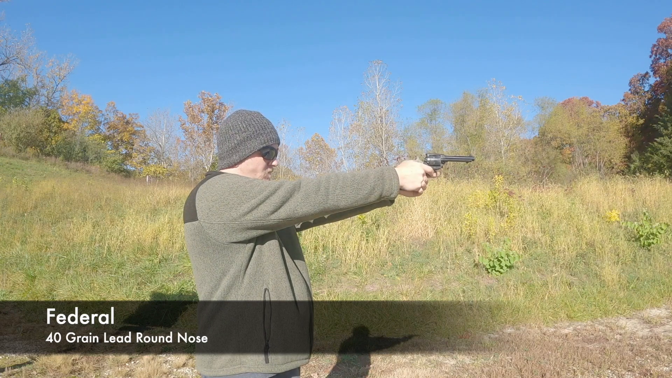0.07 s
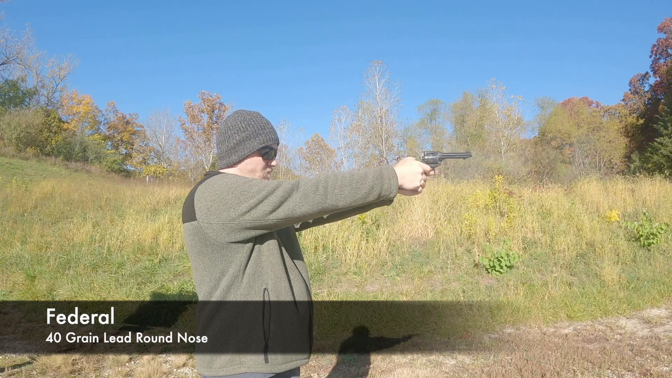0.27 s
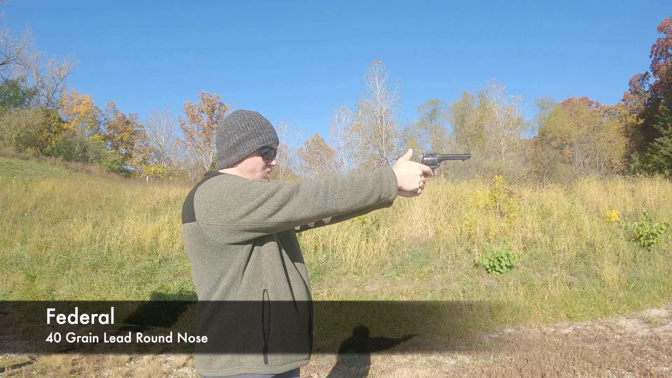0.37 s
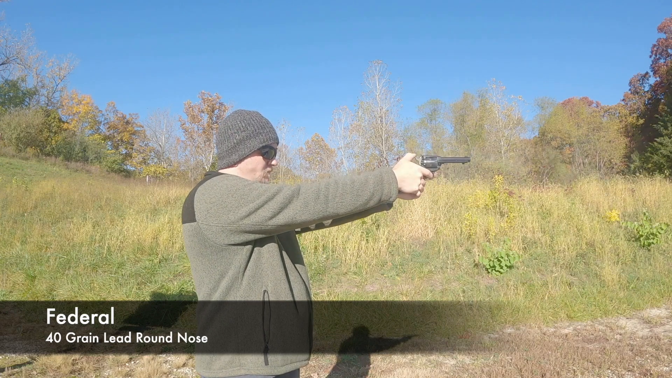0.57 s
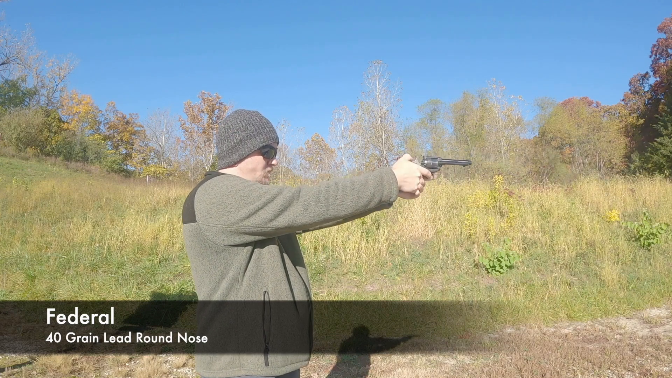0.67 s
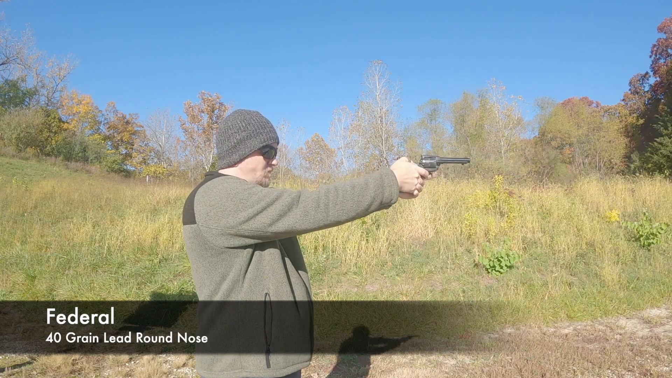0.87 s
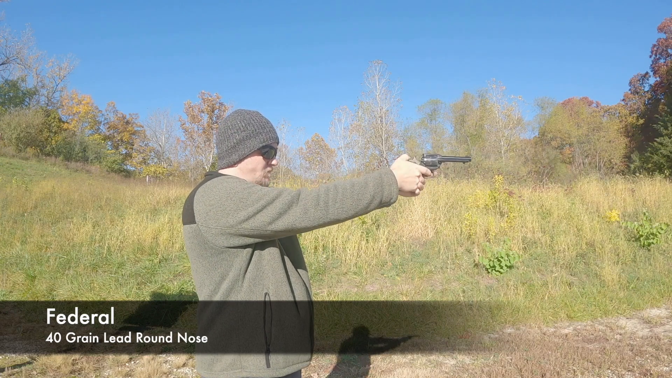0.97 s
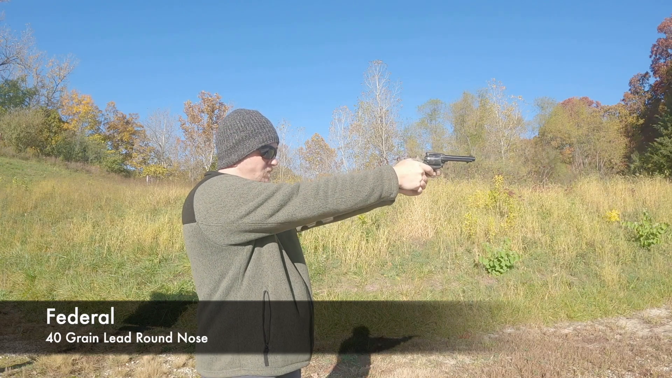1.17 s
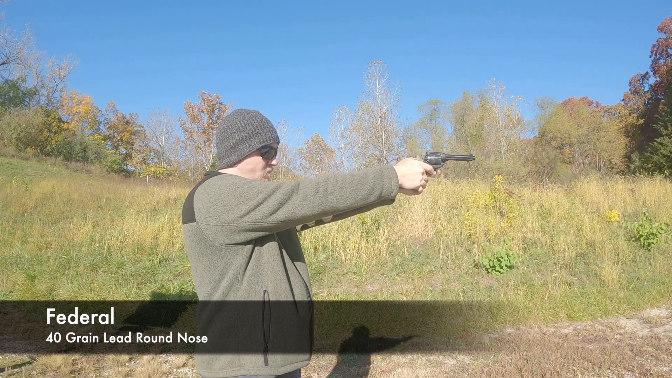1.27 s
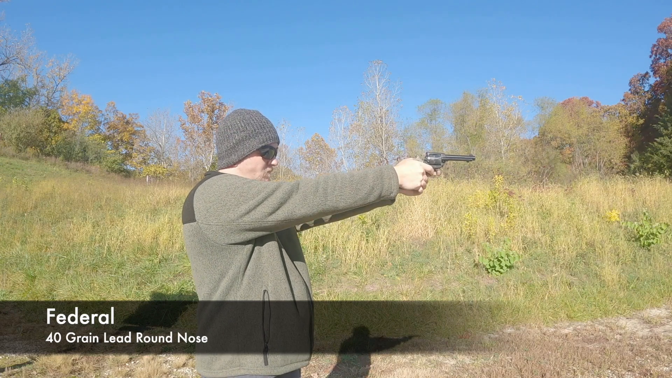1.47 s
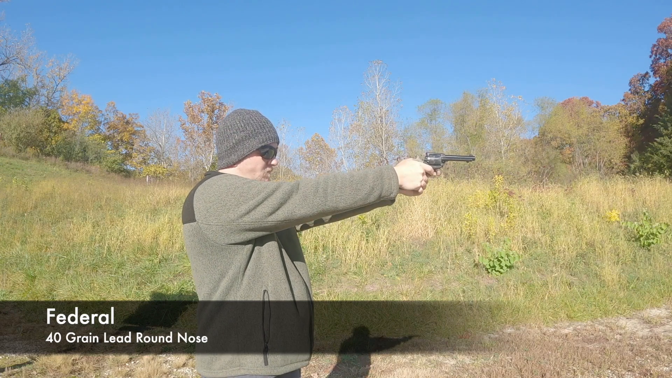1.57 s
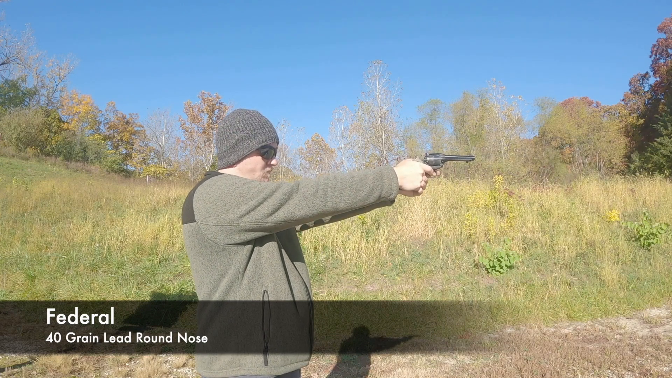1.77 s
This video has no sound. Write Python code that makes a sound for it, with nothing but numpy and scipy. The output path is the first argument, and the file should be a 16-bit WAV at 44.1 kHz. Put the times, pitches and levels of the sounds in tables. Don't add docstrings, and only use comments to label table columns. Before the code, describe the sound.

A small revolver fires once outdoors, close to an overloading camera microphone. Faint insects trill over a soft hush; a hammer knock and smeared, growing pre-echoes lead into the sharp crack at 0.23 seconds. A bank slaps back near 0.36, trees swell around 0.5, then dull and fade toward 1.8. Small metallic cocking clicks run from 0.37 to 1.0, loudest at 0.82. A faint insect returns near 1.5.

```python
import sys
import numpy as np
from scipy import signal
from scipy.fft import rfft, irfft, next_fast_len
from scipy.io import wavfile
from scipy.ndimage import uniform_filter1d, map_coordinates

SR = 44100
rng = np.random.default_rng(int(sys.argv[2]) if len(sys.argv) > 2 else 0)


def voltage_ratio(decibels):
    exponent = np.asarray(decibels, float) / 20
    return 10 ** exponent


def to_wav(sig):
    pcm = np.clip(np.atleast_2d(sig), -1, 1) * 32767
    pcm = np.round(pcm).astype(np.int16)
    wavfile.write(sys.argv[1], SR, pcm.T)


N = 79380
SHOT_S = 0.228


def unit(x):
    return x / np.sqrt(np.mean(x ** 2) + 1e-20)


def along(points, hz):
    f, v = np.transpose(points)
    return np.interp(np.log(hz + 1), np.log(f + 1), v)


def wobble(rate):
    knots = rng.standard_normal(int(N * rate / SR) + 4)
    return map_coordinates(knots, [np.arange(N) * rate / SR])


def filtered(x, response):
    m = next_fast_len(N + SR // 2)
    return irfft(rfft(x, m) * response(np.fft.rfftfreq(m, 1 / SR)), m)[..., :N]


def ring(s, hz, db, t60):
    out = np.zeros(N)
    start = int(s * SR) + 1
    t = np.arange(start, min(N, start + SR // 10)) / SR - s
    rise = 1 - np.exp(-t / 0.00008)
    out[start:start + len(t)] = voltage_ratio(db - 60 * t / t60) * np.sin(2 * np.pi * hz * t) * rise
    return out


def puff(s, hz, db, cycles):
    t = np.arange(N) / SR - s
    return voltage_ratio(db) * np.exp(-(t * hz / cycles) ** 2) * np.cos(2 * np.pi * hz * t)


def dying(s, db, t60):
    t = np.arange(N) / SR - s
    return (t > 0) * voltage_ratio(db - 60 * np.maximum(t, 0) / t60)


def noise(spectrum, grain_db):
    raw = rng.standard_normal(N) * voltage_ratio(grain_db * rng.standard_normal(N))
    return unit(filtered(raw, lambda hz: voltage_ratio(along(spectrum, hz))))


def far_hush():
    # frequency in Hz, level in dB per Hz.
    hush_color = [(90, -45.5), (150, -5), (600, 3), (1300, -2.5), (5500, -24.5), (7300, -18), (8600, -42.5),
                  (15500, -60)]
    ducked = np.arange(N) / SR > SHOT_S
    level_db = -59.5 - 5.5 * ducked + 1.2 * wobble(12)
    return voltage_ratio(level_db) * noise(hush_color, grain_db=2.0)


def trilling_insect():
    center_hz, drop_hz, ticks_hz, teeth_hz = 7480, 300, 27.3, 300
    t = np.arange(N) / SR
    stroke = np.pi * ticks_hz * (t - 0.027)
    teeth = 1 + 0.9 * np.cos(2 * np.pi * teeth_hz * t + 0.8 * wobble(40))
    phase = 2 * np.pi * center_hz * t + drop_hz / ticks_hz * np.cos(2 * stroke) + 0.9 * wobble(300)
    ticks = np.abs(np.cos(stroke)) ** 7
    return voltage_ratio(-75 + 2.5 * wobble(42)) * ticks * teeth * np.sin(phase)


def scooping_insect():
    # start in seconds, length in seconds, level in dB, held pitch in Hz.
    songs = [
        (-.08, .3, -68.5, 6973),
        (1.485, .5, -73.5, 7170),
    ]
    scoop_hz, scoop_s, rise_s = 600, 0.034, 0.11
    out = np.zeros(N)
    for s, length, db, hz in songs:
        since = np.maximum(np.arange(N) / SR - s, 0)
        pitch = hz - scoop_hz * np.exp(-since / scoop_s) + 45 * wobble(120)
        hold = np.clip(since / rise_s, 0, 1) * (since < length)
        scratch = voltage_ratio(db + 3.4 * wobble(150) + 2.5 * wobble(500))
        out += scratch * hold * np.sin(2 * np.pi * np.cumsum(pitch) / SR)
    return out


def hammer_fall():
    # time in seconds, level in dB, pitch in Hz, length in cycles.
    knocks = [
        (.1873, -23, 1800, .8),
        (.1872, -35.5, 5500, 2),
        (0.22, -32.5, 1500, 1.1),
    ]
    return sum(puff(s, hz, db, cycles) for s, db, hz, cycles in knocks)


def lockwork():
    # time in seconds, level in dB, pitch in Hz, sizzle in dB against the click.
    clicks = [
        (0.3705, -30, 5000, -14),
        (0.6118, -29.5, 3240, -34),
        (0.6837, -31, 4600, -15.5),
        (0.7362, -47, 5940, -5),
        (0.821, -20.5, 3100, -22),
        (1.0139, -37, 5170, -13.5),
    ]
    ring_t60, sizzle_t60 = 0.0065, 0.008
    sizzle = filtered(rng.standard_normal(N), lambda f: f ** 2 / 1e8 / (1 + (f / 10500) ** 8))
    sizzle = unit(sizzle)
    tap = noise([(400, -23.5), (1500, 11), (5000, -3), (9000, -16)], grain_db=7.5)
    out = np.zeros(N)
    for s, db, hz, bright_db in clicks:
        out += ring(s, hz, db, ring_t60)
        out += ring(s + 0.0002, 1.164 * hz, db - 2, ring_t60)
        out += dying(s, db + bright_db, sizzle_t60) * sizzle
        out += dying(s - 0.0008, db - 10, sizzle_t60) * tap
    return out


def crack():
    # delay in seconds, level in dB, signed strength.
    arrivals = [
        (0, 3.5, 0.47),
        (.00035, 2.5, -0.74),
        (.0016, -3, -1.3),
    ]
    # frequency in Hz, level in dB, 60 dB decay in seconds.
    modes = [(1536, -7, 0.0081), (2023, -4, 0.0051), (3280, 1.5, 0.0029), (5000, -5, .003),
             (890, -16, 0.0088)]
    out = np.zeros(N)
    for delay, db, sign in arrivals:
        for hz, level, t60 in modes:
            out += sign * ring(SHOT_S + delay, hz, db + level, t60)
    return out


def gas_spray():
    # frequency in Hz, level in dB per Hz.
    gas_color = [(88, -24), (150, 2), (1050, -29), (2020, -11.5), (3820, -17.5), (5100, -22), (15000, -75)]
    return dying(SHOT_S, -9, 0.027) * noise(gas_color, grain_db=7)


def fore_runners(blast):
    copies_db = [-2, -8, -22.5, -38]
    spacing_s, top_hz = 0.010665, 5830

    def early(f):
        total = 0
        for k, db in enumerate(copies_db):
            advance = np.exp(2j * np.pi * f * spacing_s * (k + 1))
            total = total + (-1) ** (k + 1) * voltage_ratio(db) * advance
        return total / (1 + (f / top_hz) ** 10)

    return filtered(blast, early)


def processing_grit():
    start_s = 0.199
    t = np.arange(N) / SR
    grit = unit(filtered(rng.standard_normal(N), lambda f: (f < 9600) * (f > 2100)))
    gate = (t > start_s) * (t < SHOT_S + 0.004)
    return voltage_ratio(-46.5 + 300 * (t - start_s)) * grit * gate


def shot():
    # frequency in Hz, level in dB, 60 dB decay in seconds.
    push = [(95, -19, .03), (155, -15, 0.049), (353, -8, .04), (588, -25, 0.034)]
    # frequency in Hz, level in dB per Hz.
    near_color = [(100, -31), (290, -5.5), (450, -2.5), (800, -13), (2500, -10.5), (7500, -21.5),
                  (9000, -33.5), (15000, -55.5)]
    core = crack() + sum(ring(SHOT_S, *mode) for mode in push)
    blast = core + gas_spray() - puff(SHOT_S + 0.00653, 600, -14.5, 0.63)
    smeared = core + voltage_ratio(1.5) * gas_spray() + puff(SHOT_S + 0.00767, 600, -11.5, 0.53)
    near = dying(SHOT_S, -34.5, 0.34) * noise(near_color, grain_db=4.5)
    return voltage_ratio(2.5) * (blast + fore_runners(smeared)) + processing_grit() + near


def ground_thuds():
    hz, width_hz = 261, 200
    raw = rng.standard_normal(N) * voltage_ratio(4.1 * wobble(45))
    thuds = filtered(raw, lambda f: (1j * f * width_hz / (hz ** 2 - f * f + 1j * f * width_hz)) ** 2)
    return dying(SHOT_S, -44.5, 1.2) * unit(thuds)


def berm_and_trees():
    # time in seconds, level in dB.
    slaps = [
        (0.3584, -24.5),
        (.3604, -30),
        (0.3622, -27),
    ]
    # time in seconds, level in dB.
    swell = [(0.331, -52), (.352, -50), (.365, -40), (0.402, -41), (0.437, -32.5), (0.464, -30),
             (.49, -26.5), (.53, -31), (.56, -31), (.61, -35.5), (.67, -37.5), (0.748, -40), (.85, -43),
             (0.949, -46.5), (1.1, -48), (1.3, -50), (1.5, -54.5), (1.8, -58.5)]
    # frequency in Hz, level in dB per Hz.
    wood_color = [(130, -55), (330, -9), (640, -0.5), (1500, -5), (3300, -3.5), (7600, -21.5),
                  (9200, -36.5), (15500, -50)]
    # time in seconds, level in dB, pitch in Hz, length in cycles.
    trunks = [(0.3388, -34, 2410, 2.4), (0.3981, -30.5, 238, 0.52), (0.4104, -25, 300, 0.37),
              (.488, -27.5, 635, 0.65), (.6, -38, 336, 1), (.68, -30.5, 790, 2), (.968, -37, 520, 1.4),
              (1.24, -41, 600, 2.2), (1.302, -40.5, 600, 2.7), (1.428, -46.5, 564, 3.3)]

    def berm(f):
        return sum(voltage_ratio(db) * np.exp(-2j * np.pi * f * (s - SHOT_S)) for s, db in slaps)

    hz, t, z = signal.stft(noise(wood_color, grain_db=2.5), SR, nperseg=256)
    hz = hz[:, None]
    air_loss_db = 6.5 * (hz / 1000) ** 0.95 * np.maximum(t - 0.41, 0)
    bass_wait = np.exp(-np.maximum(t - slaps[0][0], 0) / 0.058)
    bass_loss_db = 7 * bass_wait / (1 + (hz / 1800) ** 4)
    patch = uniform_filter1d(rng.standard_normal(z.shape), 4, 0)
    patch = unit(uniform_filter1d(patch, 8, 1))
    z = z * voltage_ratio(1.9 * patch - air_loss_db - bass_loss_db)
    wood = signal.istft(z, SR, nperseg=256)[1][:N]
    wood = wood / np.sqrt(np.abs(uniform_filter1d(wood ** 2, SR // 12)) + 1e-12)
    s, db = np.transpose(swell)
    level_db = np.interp(np.arange(N) / SR, s, db, left=-120) + 0.65 * wobble(130)
    trunk_returns = sum(puff(s, hz, db, cycles) for s, db, hz, cycles in trunks)
    return filtered(crack(), berm) + voltage_ratio(level_db) * wood + trunk_returns


def scene():
    insects = trilling_insect() + scooping_insect()
    revolver = hammer_fall() + shot() + lockwork()
    echo = ground_thuds() + berm_and_trees()
    return np.tile(far_hush() + insects + revolver + echo, (2, 1))


def low_pass(x):
    return signal.sosfilt(signal.butter(12, 15700, fs=SR, output="sos"), x)


def record(dry):
    low_hz, top_hz, knee = 120, 12100, 7.2

    def microphone(f):
        low_cut = (1j * f) ** 2 / ((1j * f) ** 2 + 1.4j * f * low_hz + low_hz ** 2)
        return low_cut / (1 + 1j * (f / top_hz) ** 3)

    def sides(f):
        tilt_db = 1.5 * np.array([[1], [-1]])
        treble = 1 / (1 + (9000 / (f + 1)) ** 4)
        return voltage_ratio(tilt_db * treble) / (1 + (f / 15000) ** 12)

    x = filtered(dry, microphone)
    x = x / (1 + np.abs(x) ** knee) ** (1 / knee)
    return low_pass(filtered(x, sides))


dry = scene()
out = record(dry)
to_wav(out)
```